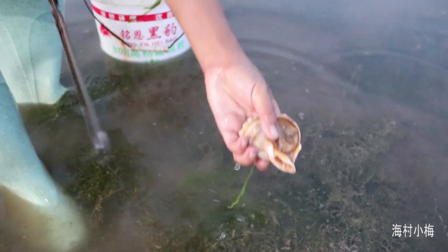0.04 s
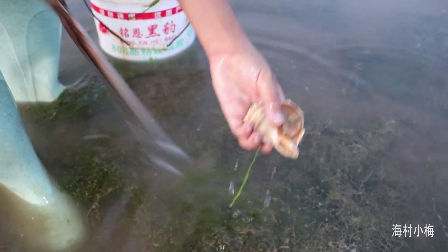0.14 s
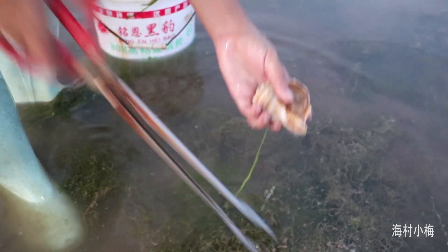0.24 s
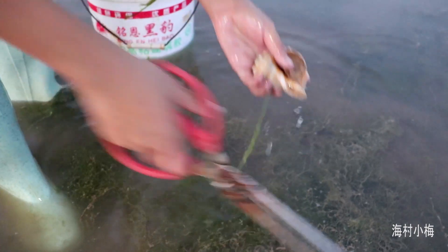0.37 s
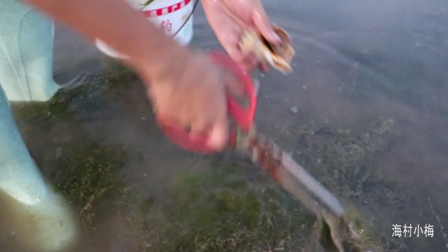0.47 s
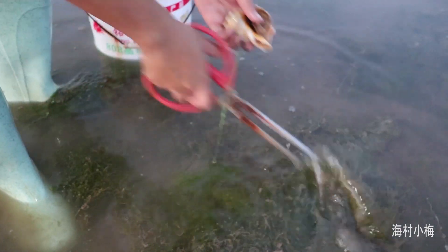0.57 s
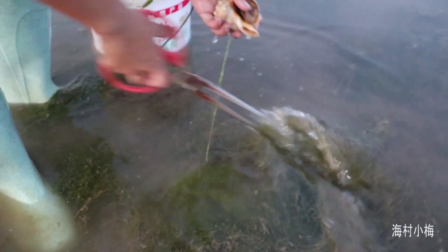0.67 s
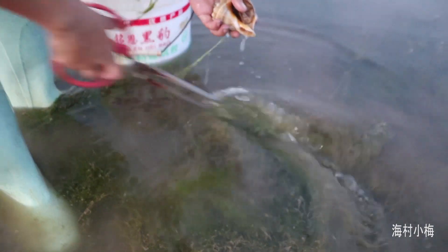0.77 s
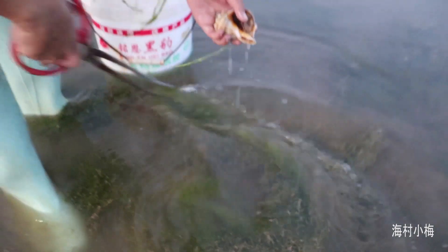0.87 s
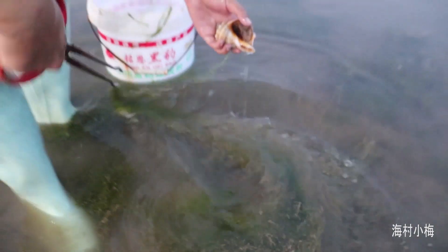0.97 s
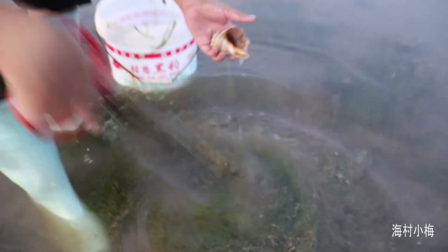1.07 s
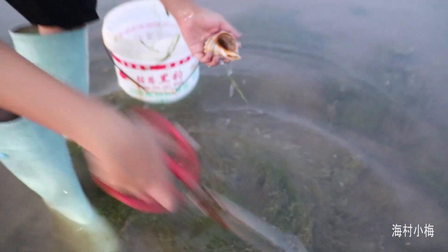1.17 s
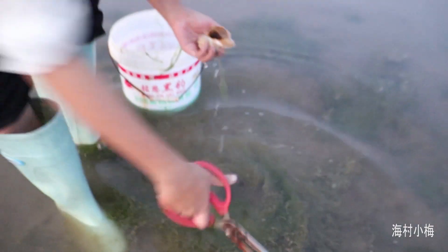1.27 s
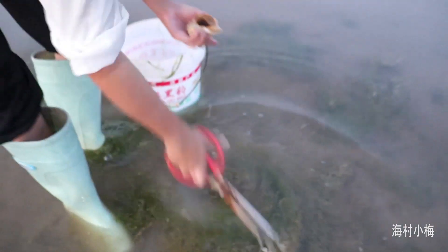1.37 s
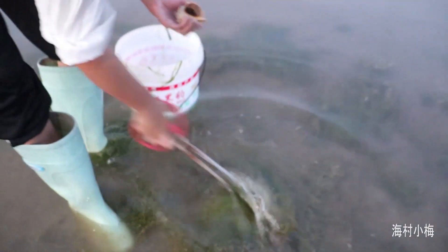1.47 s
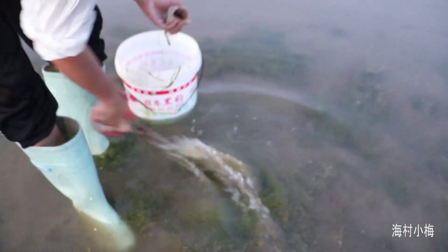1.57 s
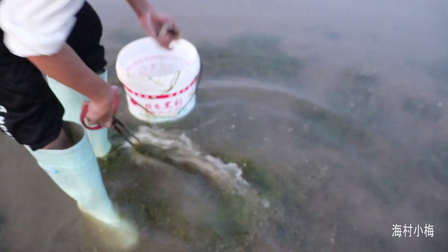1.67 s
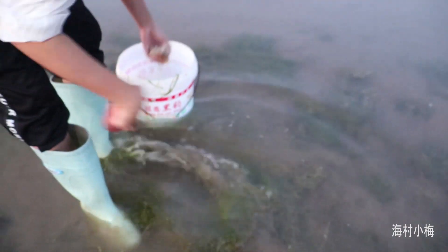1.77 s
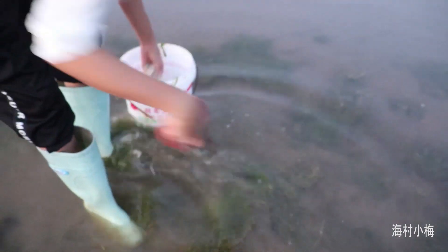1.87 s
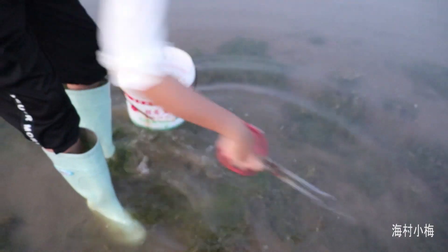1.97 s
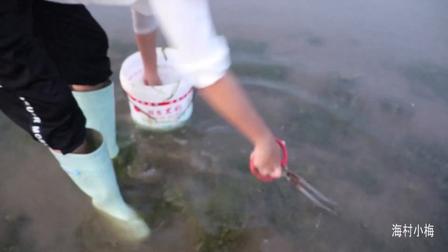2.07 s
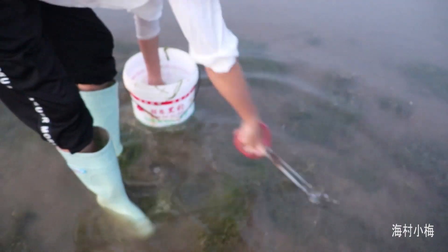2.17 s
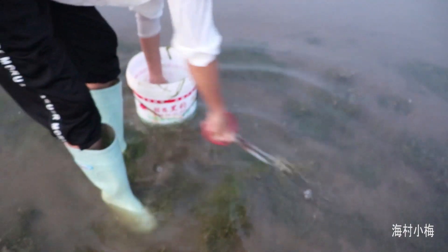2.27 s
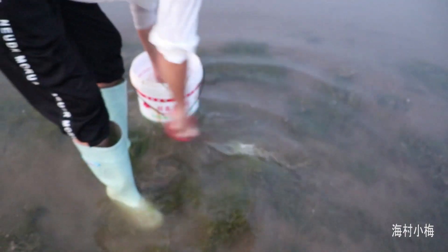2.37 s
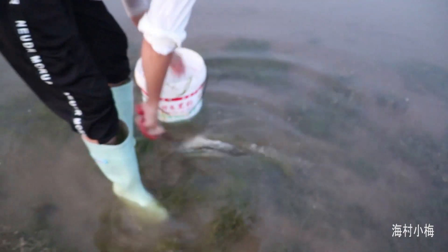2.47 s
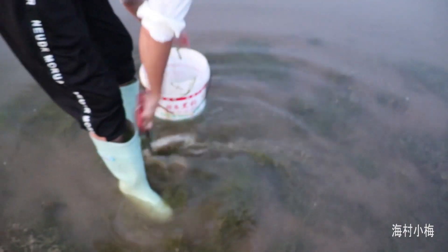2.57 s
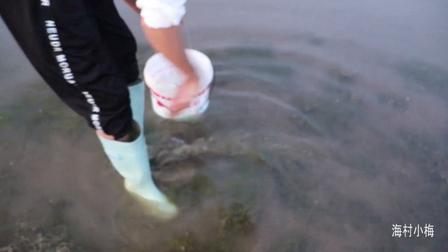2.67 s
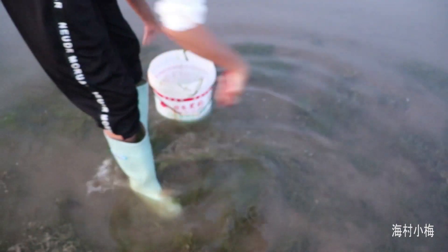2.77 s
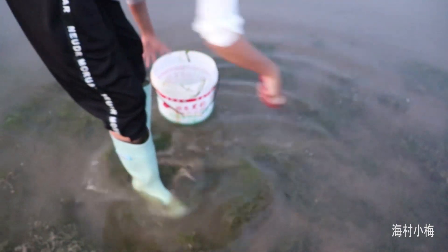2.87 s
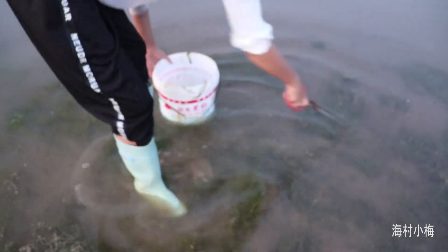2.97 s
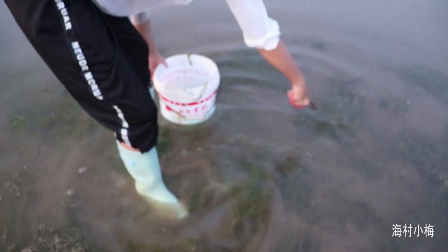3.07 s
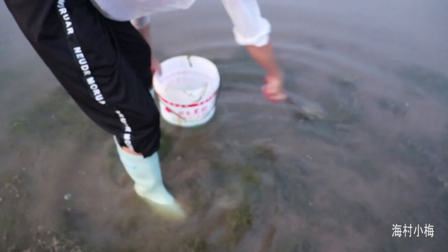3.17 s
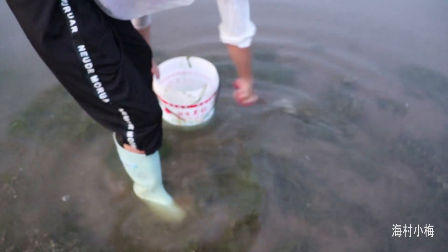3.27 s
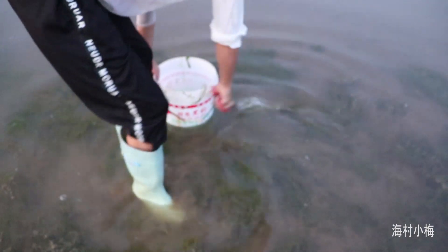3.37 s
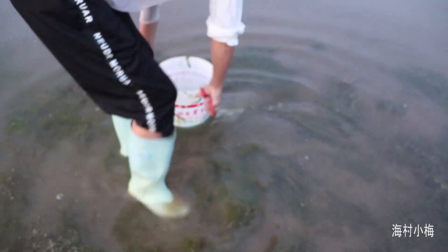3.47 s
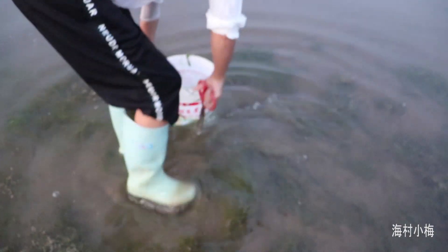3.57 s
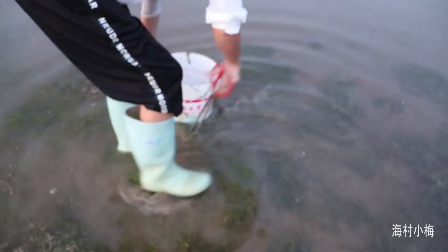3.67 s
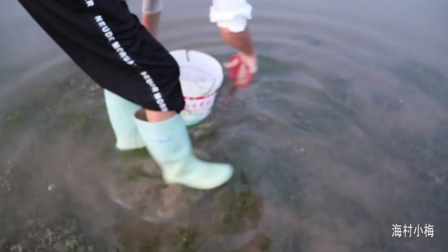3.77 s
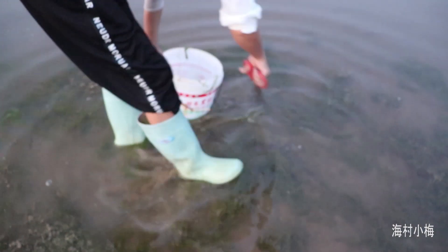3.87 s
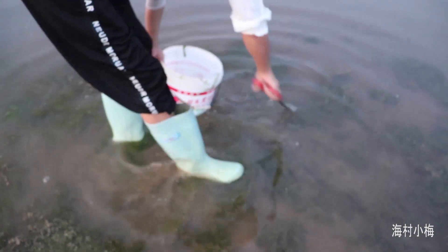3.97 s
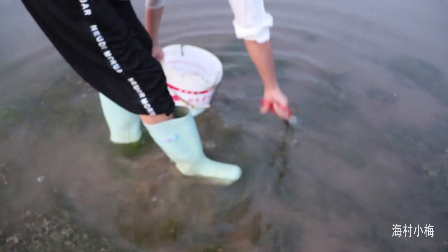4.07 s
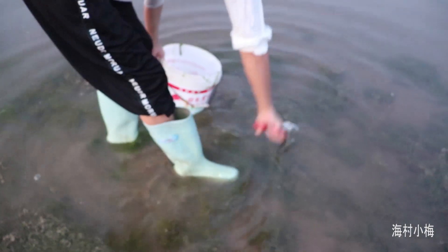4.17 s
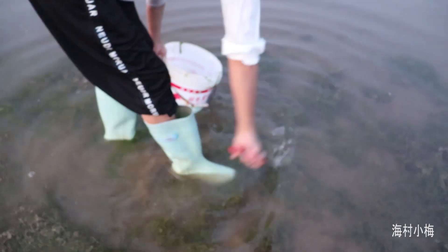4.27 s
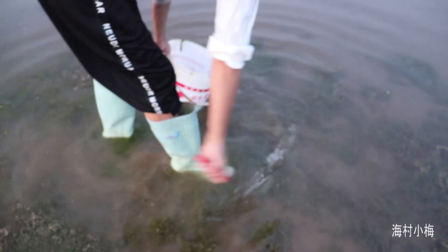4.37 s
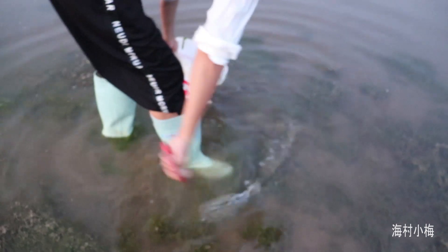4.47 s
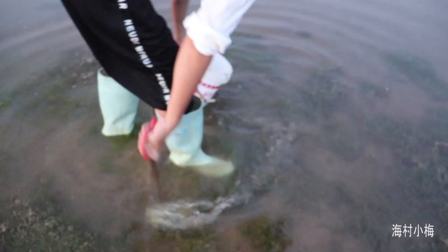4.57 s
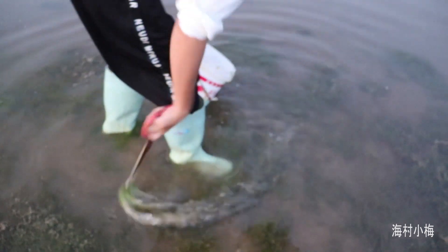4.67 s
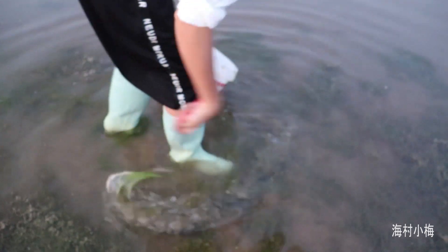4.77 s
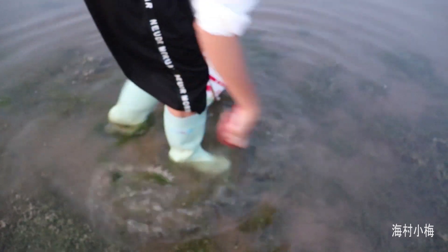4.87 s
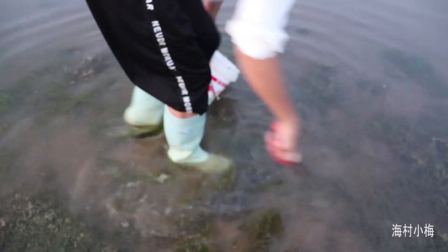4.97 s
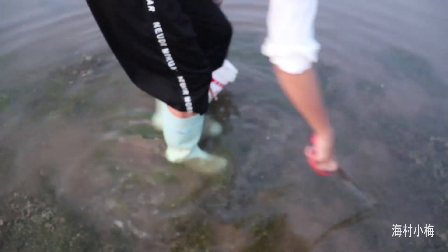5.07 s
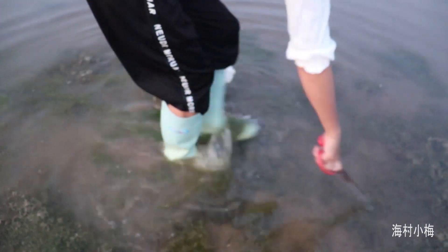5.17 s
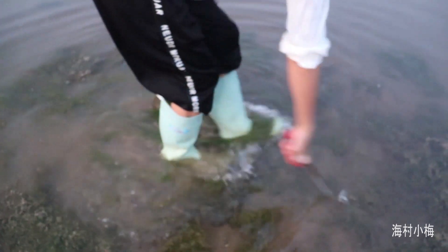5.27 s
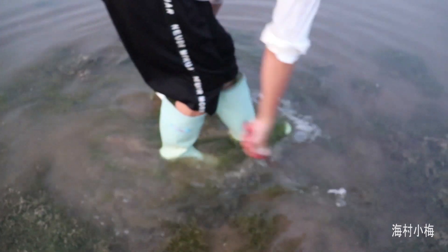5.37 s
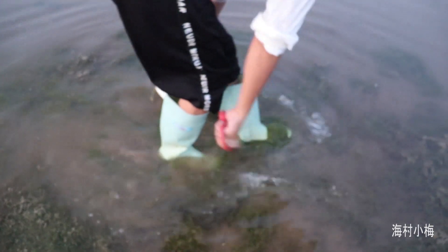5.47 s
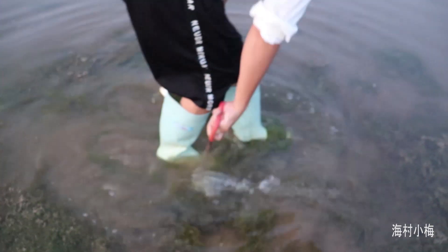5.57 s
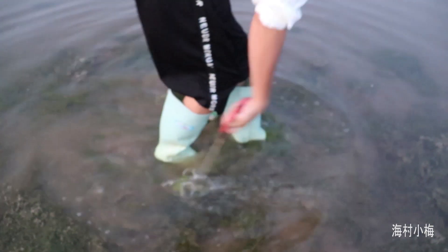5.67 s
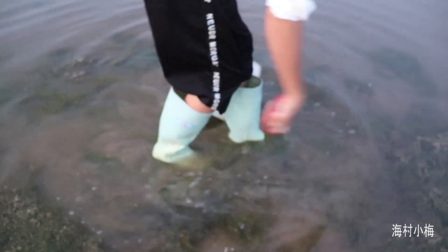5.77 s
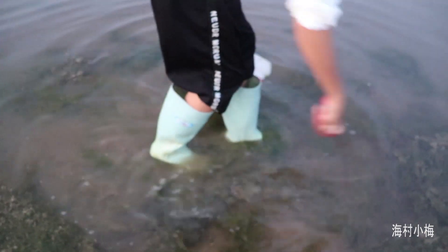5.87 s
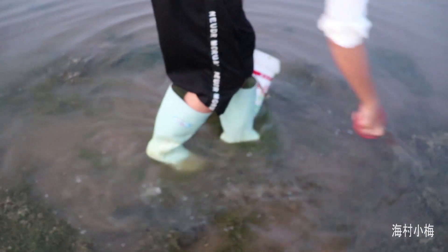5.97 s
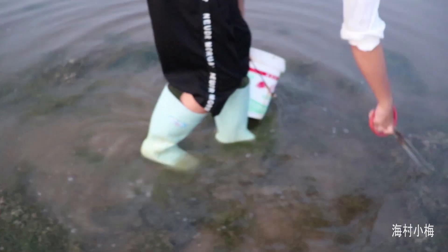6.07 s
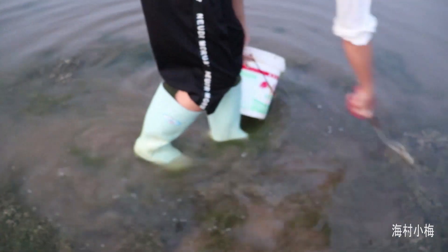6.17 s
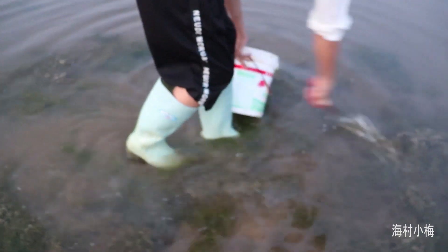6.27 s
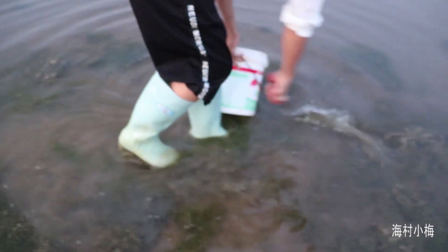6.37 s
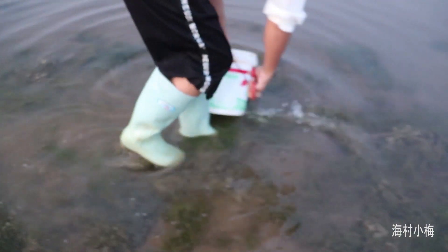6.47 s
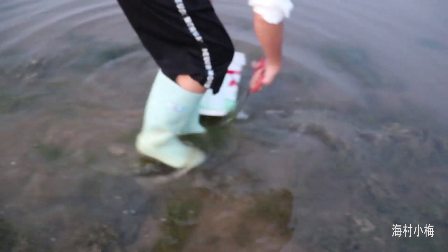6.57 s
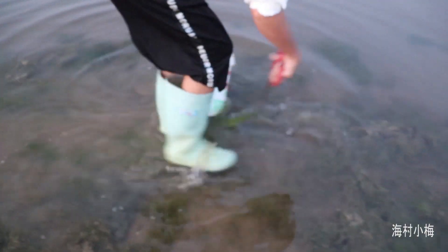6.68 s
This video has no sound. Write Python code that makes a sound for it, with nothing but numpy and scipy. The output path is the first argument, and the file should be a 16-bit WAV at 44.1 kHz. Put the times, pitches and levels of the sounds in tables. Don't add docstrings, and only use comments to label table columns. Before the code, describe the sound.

Long steel tongs rake through shallow seawater in bursts of splashing spray, with bubbling, pattering drops, boot slosh and a shell knocking a plastic bucket.

```python
import sys
import numpy as np
from scipy import signal
from scipy.io import wavfile
from scipy.ndimage import uniform_filter1d, map_coordinates

SR = 44100
rng = np.random.default_rng(int(sys.argv[2]) if len(sys.argv) > 2 else 0)


def dump_mix(stems):
    frames = np.atleast_2d(stems).T
    limited = np.clip(frames, -1, 1)
    pcm = np.round(limited * 32767).astype(np.int16)
    wavfile.write(sys.argv[1], SR, pcm)


def to_linear_factor(level_db):
    exponent = np.asarray(level_db, float) / 20
    return 10 ** exponent


N = 297234

# [t/s, rise/s, fall/s, spray level at the crest/dB, mist over spray/dB,
# extra slosh/dB]
STROKES = [
    (1.437, 0.086, 0.05, -27.5, 3, 0),
    (1.575, 0.052, 0.12, -32, 0.5, 6.5),
    (2.201, 0.097, 0.33, -30, 0, 1.5),
    (3.237, 0.15, 0.24, -33, 2.5, 2.5),
    (4.188, 0.0068, 0.12, -38.5, -2, 0),
    (4.331, 0.084, 0.243, -29.5, -1, -2.5),
    (5.341, 0.19, 0.075, -23.5, -1, -0.5),
    (6.336, 0.072, 0.15, -33, 1.5, 4),
]
# [t/s, length/s, slosh level/dB, spray level/dB]
PATTER = [(0.077, 0.067, -69, -51.5), (0.485, 0.025, -41.5, -39.5), (0.556, 0.047, -36.5, -39.5),
          (0.79, 0.18, -46.5, -49.5), (0.973, 0.061, -45.5, -62), (1.098, 0.061, -41, -49),
          (1.38, 0.041, -24.5, -26.5), (1.757, 0.12, -32.5, -38), (1.897, 0.34, -49, -49),
          (2.65, 0.36, -41.5, -42.5), (3.02, 0.28, -52, -55), (3.172, .055, -64, -51),
          (3.644, 0.4, -41, -46), (3.969, 0.17, -47, -49), (4.279, 0.1, -32, -64), (4.612, 0.22, -33, -46),
          (4.85, 0.11, -42.5, -45), (4.98, 0.53, -53.5, -53), (5.293, 0.05, -29.5, -37.5),
          (5.58, 0.15, -33.5, -43.5), (5.733, 0.17, -43.5, -45.5), (5.902, 0.29, -72, -54),
          (6.164, .11, -37, -43), (6.589, .2, -40.5, -47.5)]
# [t/s, half width/s, level/dB]
SURGES = [(1.433, 0.039, -8.5), (1.504, 0.044, 5.5), (1.557, 0.027, -3), (1.59, 0.0065, -10),
          (1.62, 0.024, 5), (2.27, 0.032, -7), (2.295, 0.018, 3), (2.39, 0.025, 6), (2.606, 0.0079, -2.5),
          (2.645, .01, 4.5), (3.26, 0.04, 5.5), (3.33, 0.042, -1.5), (3.451, 0.01, -5), (3.485, 0.0081, 1),
          (3.53, 0.013, -10.5), (3.583, 0.012, -8), (3.666, 0.0055, 11), (4.284, 0.0097, -8),
          (4.304, 0.014, 3.5), (4.325, .01, -7), (4.35, 0.011, 6.5), (4.42, .014, 3), (4.47, 0.021, -3),
          (4.493, 0.0069, 7), (4.522, 0.017, 7), (4.581, 0.011, 7), (4.61, 0.006, 9.5), (4.65, 0.016, -5),
          (5.3, 0.019, -6), (5.468, 0.026, 4), (5.55, 0.016, 6.5), (5.6, 0.0089, -2), (5.616, 0.0083, 5.5),
          (6.175, .02, -11), (6.383, 0.024, 5.5), (6.567, 0.034, -8)]
# [t/s, left over right level/dB]
SWEEP_PAN = [(0.0, 6), (0.34, 1), (4.79, -0.5), (6.74, -1.5)]
# [f/Hz, level per Hz/dB]
SLOSH = [(350, -23), (600, 7.5), (950, -16), (1500, 2), (2700, 3.5), (4000, 1.5)]
# [f/Hz, level per Hz/dB]
SPRAY = [(2500, -1), (5000, -5.5), (8040, 0.5), (9300, -2.5), (11700, -6), (14700, -9)]
# [f/Hz, width/Hz, level/dB]
TONGS = [(1360, 90, -2), (2660, 60, 7), (4220, 70, 6), (4800, 60, 4), (5500, 70, 0), (8000, 110, 5),
         (11950, 130, 4), (13900, 130, 5)]
# [t/s, f/Hz]
WAKE = [(1.4, 1114), (1.52, 1494), (1.62, 883), (1.88, 963), (2.25, 1000), (2.6, 1173), (3.25, 1200),
        (3.32, 1577), (3.45, 1098), (4.3, 1250), (4.55, 1000), (4.8, 836), (5.33, 1050), (5.39, 620),
        (5.445, 1506), (5.5, 1793), (5.55, 1000), (5.7, 1105), (6.37, 1170), (6.5, 1530)]
# [t/s, peak level/dB, f/Hz]
PLOPS = [(1.382, -24, 1280), (1.483, -21, 2550), (1.504, -14.5, 2530), (1.57, -16.5, 1940),
         (1.607, -17.5, 797), (1.63, -15, 930), (1.8, -18.5, 2450), (2.327, -6, 1485), (2.373, -18, 1490),
         (2.423, -23.5, 677), (2.484, -17.5, 1520), (2.618, -24.5, 2470), (3.431, -21, 2380),
         (3.539, -24.5, 2600), (3.611, -24.5, 1100), (3.619, -18.5, 1950), (4.333, -16.5, 2190),
         (4.386, -23.5, 1204), (4.581, -18, 3140), (4.607, -20, 1610), (1.001, -23, 2700),
         (5.464, -30, 1750), (5.535, -21, 1232), (5.558, -17.5, 2270), (6.369, -25, 2300),
         (6.411, -23, 1360), (6.46, -15, 2780), (6.475, -19.5, 2460)]
# [t/s, peak level/dB, f/Hz]
GURGLES = [(1.392, -7, 1335), (1.423, -16.5, 1100), (1.501, -13, 2650), (1.582, -19.5, 1210),
           (1.662, -14, 2220), (1.695, -15.5, 840), (1.78, -20, 1360), (1.819, -15.5, 1200),
           (1.872, -20.5, 1200), (2.247, -18, 1950), (2.403, -22.5, 630), (2.45, -20, 2630),
           (2.521, -20, 1260), (2.567, -20, 1020), (2.589, -24, 1570), (2.645, -17.5, 1750),
           (3.263, -17, 1390), (3.639, -17.5, 3100), (3.664, -20, 1340), (3.701, -19.5, 1270),
           (4.196, -25, 960), (4.298, -17, 1340), (4.416, -17, 1670), (4.489, -10.5, 3000),
           (4.537, -18, 1000), (4.633, -14.5, 1086), (4.75, -14.5, 1520), (4.774, -19, 910),
           (5.38, -12.5, 2970), (5.503, -14, 1510), (5.62, -20, 930)]
# [t/s, peak level/dB, f/Hz]
TRICKLE = [(2.684, -35, 1601), (2.733, -28, 3110), (2.755, -21.5, 1430), (2.809, -18.5, 1310),
           (2.823, -26, 1380), (2.847, -35, 756), (2.908, -34, 1560), (2.949, -30, 795), (2.983, -31, 703),
           (3.011, -34, 1640), (3.219, -27, 4170), (3.829, -33, 760), (3.926, -24.5, 1390),
           (3.976, -23, 2760), (4.029, -17, 2660), (4.112, -23, 3350), (5.041, -27.5, 1120),
           (5.13, -28.5, 2660), (5.259, -26, 1000), (5.849, -34, 855), (6.654, -27, 2080),
           (6.673, -22, 1760)]
# [t/s, peak level/dB, f/Hz, left over right level/dB]
DROPS = [(0.488, -25.5, 1315, -6), (0.554, -22.5, 2710, -14), (0.58, -20, 944, 4), (0.75, -32.5, 1750, -6),
         (0.81, -25.5, 1950, -4), (0.835, -27, 1540, -4), (0.883, -20.5, 1360, 2), (0.98, -27.5, 1420, 3),
         (1.981, -34, 1180, 4), (2.187, -21, 2730, -8), (2.231, -19, 975, 4), (2.792, -19, 2800, -4),
         (2.881, -22.5, 2560, 5), (3.692, -23, 1300, 0), (3.719, -19, 1330, 1), (3.789, -24, 1330, 0),
         (3.887, -26.5, 1430, 3.5), (4.011, -25.5, 1080, 2), (4.068, -23.5, 1320, 1),
         (4.148, -28, 2430, -3.5), (4.207, -24, 1000, 2), (4.827, -18, 2966, -3), (5.184, -24.5, 975, -1),
         (5.224, -20.5, 2690, -2.5), (5.244, -25.5, 965, 1), (5.882, -24.5, 1980, 0), (5.913, -28, 1622, 2),
         (6.316, -28.5, 1210, -9), (6.606, -27, 1540, 2), (6.711, -23, 2150, 0)]
# [t/s, peak level/dB, f/Hz, left over right level/dB]
TICKS = [(0.5367, -28, 3260, -2.0), (0.5869, -14.5, 4000, -2), (0.6787, -22.5, 7500, -3),
         (0.7253, -30, 3800, -4.5), (1.1363, -24.5, 4040, 4), (1.3831, -17.5, 4470, -3),
         (1.3962, -8.5, 6500, -2.5), (1.7419, -16.5, 3640, 3.5), (1.7998, -17.5, 3480, 4.5),
         (1.8947, -15.5, 3540, 5.5), (2.0528, -20, 3640, -2), (2.2135, -11, 5570, -5),
         (2.23, -10.5, 3700, -5), (3.24, -19.5, 4100, -3.5), (3.6927, -16.5, 3700, 13.5),
         (3.784, -18.5, 3800, 1), (3.8545, -15.5, 7160, 10.5), (3.8625, -23, 7100, 6),
         (3.8854, -21, 3320, 2), (3.997, -20.5, 5100, 3), (4.805, -18, 5040, 4), (4.8912, -13.5, 5100, 9),
         (5.187, -18.5, 3450, 5), (5.3887, -18, 3140, -1.0), (5.5762, -10, 7200, 1),
         (5.7618, -23, 2750, -1.0), (5.8064, -22.5, 3630, 9), (6.5987, -21, 6500, -2.5),
         (6.6382, -23.5, 3180, 0), (6.6716, -20, 5830, -4), (6.73, -24.5, 3550, 0)]
# [t/s, peak level/dB, f/Hz]
SPATTER = [(0.7908, -28, 4600), (0.805, -28, 5140), (1.059, -33.5, 5000), (1.165, -26.5, 4520),
           (1.2037, -32, 11600), (1.7622, -19, 3500), (1.846, -20, 8300), (1.8644, -27, 4740),
           (2.2951, -11.5, 4040), (2.6244, -18, 8300), (2.6467, -17.5, 5200), (2.6643, -22.5, 3650),
           (2.7272, -36, 7240), (3.676, -34, 3870), (3.7161, -29, 3507), (4.4064, -14.5, 4050),
           (4.5162, -11.5, 7900), (4.5356, -11, 4840), (4.6253, -15, 5800), (4.6688, -23, 8520),
           (4.687, -17, 3750), (4.716, -27, 3540), (4.751, -25, 3500), (4.767, -28, 7720),
           (4.786, -24, 5250), (4.8775, -20, 4860), (4.92, -30, 5500), (4.9347, -24.5, 3450),
           (4.9607, -25, 6840), (5.2844, -27.5, 3460), (5.322, -26, 3760), (5.359, -22, 3480),
           (5.502, -8, 3940), (5.6536, -24, 4140), (5.7219, -25, 3340), (5.7885, -26, 3660)]
# [t/s, peak level/dB, first f/Hz, last f/Hz, length/s]
GULPS = [(0.489, -27.5, 1100, 2950, 0.018), (3.446, -34.5, 450, 545, 0.041), (0.579, -27, 910, 960, 0.021),
         (1.101, -27.5, 707, 750, 0.035), (1.129, -32, 720, 2400, 0.019), (1.412, -27, 410, 730, 0.0595),
         (3.616, -29, 542, 660, 0.045), (3.786, -27, 438, 870, 0.087), (5.297, -27.5, 660, 1500, 0.054),
         (4.1, -33, 2000, 3550, 0.028), (5.206, -30.5, 1700, 4200, 0.021), (1.826, -26.5, 720, 1200, 0.032),
         (4.157, -36.5, 750, 880, 0.022), (1.005, -32.5, 855, 980, .025), (6.5, -38, 550, 710, 0.029),
         (3.71, -27.5, 1000, 1200, 0.0275)]
# [t/s, peak level/dB, f/Hz]
SLAPS = [
    (0.488, -26, 1820),
    (1.606, -7, 1310),
    (3.432, -11, 2600),
    (4.334, -10.5, 2260),
    (5.381, -15, 2900),
    (5.505, -14, 4020),
    (5.558, -15, 2304),
    (6.5, -12, 5500),
]
# [t/s, peak level/dB, f/Hz]
PUSHES = [(1.513, -25, 131), (1.637, -22, 160), (2.439, -17, 177), (2.713, -20, 184), (2.865, -19, 173),
          (3.008, -22.5, 245), (3.215, -26, 248), (3.735, -25, 220), (3.806, -16.5, 222), (4.231, -25, 183),
          (4.383, -12.5, 294), (4.586, -27, 238), (4.758, -24, 239.7), (5.311, -32, 205), (5.45, -29, 162)]
# [t/s, length/s, level/dB]
WASHES = [
    (1.593, 0.15, -30.5),
    (3.424, 0.11, -41.5),
    (4.715, 0.2, -40),
    (4.939, 0.16, -43.5),
    (6.178, 0.16, -34.5),
]
# [t/s, peak level/dB]
SHELL = [
    (2.325, -2),
    (2.33, -4),
    (2.424, -4.5),
    (2.926, -13),
    (5.225, -8.5),
]
# [f/Hz, level/dB, time to fall 60 dB/s]
BUCKET = [(561, 2, 0.026), (1600, -2.5, 0.0082), (2450, -6, 0.029), (3640, -25, .01)]
# [t/s, buffet level/dB]
GUST = [(0.0, -51.5), (1.24, -44.5), (1.43, -44), (1.5, -36.5), (1.95, -43.5), (2.21, -41), (2.27, -55),
        (2.48, -29.5), (2.61, -46), (3.12, -61.5), (3.4, -58), (3.81, -49), (4.09, -85), (4.28, -49),
        (4.99, -109), (5.22, -44), (5.61, -76), (6.74, -58)]
# [f/Hz, level per Hz/dB]
SHORE = [(400, -16), (700, 4.5), (1300, -12), (2600, -16.5), (4500, -14), (9000, -17), (16400, -25)]
# [f/Hz, width/Hz, level/dB]
SHORE_BANDS = [(1000, 21, 8), (1715, 265, 8.5), (5800, 310, -1.5)]
# [t/s, f/Hz, level/dB]
WADER = [
    (2.03, 2750, -66),
    (2.07, 2300, -56),
    (2.11, 2200, -54),
    (2.15, 2600, -55),
    (2.185, 3100, -58),
]
# [f/Hz, likeness from -1 to 1]
LIKENESS = [(30, .6), (125, 0.7), (300, 0.66), (700, 0.75), (2000, 0.58), (5000, 0.69), (12000, 0.63)]

ATTACK_S, SLOSH_RELEASE_DB_PER_S, SPRAY_RELEASE_DB_PER_S = 0.0013, 337, 603
CALM_SLOSH_DB, CALM_SPRAY_DB = -56.5, -61
MIST_STEEPER, PATTER_MIST_DB = 0.067, -4
SWELL_DB_PER_S, SAG_DB = 53, 3
SLOSH_SWELLS, STROKE_SLOSH_DB = 0.52, -5.5
PATTER_SAG_DB_PER_S = 2.5
EDGEWISE_S = 5.47
WAKE_DB, WAKE_WIDTH_HZ = -11.5, 90
PORT_LAG, PORT_WANDER_PER_S = 1.1, 2.5
RUMBLE_DB, RUMBLE_FOLLOWS, RUMBLE_STIRRED_DB = -46.5, 0.19, -42
SHORE_DB = -44.5
INSECT_DB, INSECT_HZ, INSECT_FALL_HZ, INSECT_GAP_S = -62, 6400, 800, 0.064


def stir(s, length, shape_db, release):
    out, i = np.zeros(N), int(s * SR)
    t = np.arange(min(N - i, int((length + 60 / release) * SR))) / SR
    level_db = shape_db(np.minimum(t, length)) - release * np.maximum(t - length, 0)
    attack = np.minimum(t / ATTACK_S, 1)
    out[i:i + len(t)] = to_linear_factor(2 * level_db) * attack ** 2
    return out


def stirring():
    slosh, spray = to_linear_factor(2 * CALM_SLOSH_DB), to_linear_factor(2 * CALM_SPRAY_DB)
    mist = to_linear_factor(2 * (CALM_SPRAY_DB + PATTER_MIST_DB))
    for s, rise, fall, spray_db, fine_db, deep_db in STROKES:
        length = rise + fall

        def crest(t):
            return np.interp(t, [0, rise, length], [-SWELL_DB_PER_S * rise, 0, -SAG_DB])

        def slosh_shape(t):
            return spray_db + STROKE_SLOSH_DB + deep_db + SLOSH_SWELLS * crest(t)

        def mist_shape(t):
            return spray_db + fine_db + (1 + MIST_STEEPER) * crest(t)

        slosh = slosh + stir(s, length, slosh_shape, SLOSH_RELEASE_DB_PER_S)
        spray = spray + stir(s, length, lambda t: spray_db + crest(t), SPRAY_RELEASE_DB_PER_S)
        mist = mist + stir(s, length, mist_shape, SPRAY_RELEASE_DB_PER_S)

    def sag(t):
        return -PATTER_SAG_DB_PER_S * t

    for s, length, slosh_db, spray_db in PATTER:
        slosh = slosh + to_linear_factor(2 * slosh_db) * stir(s, length, sag, SLOSH_RELEASE_DB_PER_S)
        fine = to_linear_factor(2 * spray_db) * stir(s, length, sag, SPRAY_RELEASE_DB_PER_S)
        spray = spray + fine
        mist = mist + to_linear_factor(2 * PATTER_MIST_DB) * fine
    return 10 * np.log10([slosh, spray, mist])


def surges():
    out = np.zeros(N)
    for s, half, level_db in SURGES:
        i = np.arange(int((s - half * 2) * SR), int((s + half * 2) * SR))
        out[i] += level_db * np.exp(-2 * ((i / SR - s) / half) ** 2)
    return out


def bubble_crowd():
    crowd, draw = np.zeros((2, N)), rng.random((1900, 6))
    pockets_hz = np.interp(draw[:, 0] * N / SR, *np.transpose(WAKE))
    for pocket_hz, (when, size, loud, rise, place, ring) in zip(pockets_hz, draw):
        hz = pocket_hz * (.88 + size) if size < .25 else 380 * 18 ** size
        level_db = -3.2 * np.log(loud + .2) + .5 * at_hz(SLOSH, min(hz, 3100))
        level_db -= 5.0 * max(np.log2(hz / 3000), 0)
        sound = bubble(hz, 3.0 + 7.0 * ring ** 3, .32 * rise - .05)
        add(crowd, when * N / SR, to_linear_factor(level_db) * sound, 18.0 * (place - .5))
    return rms_one(crowd)


def sweeps(slosh_db, spray_db, mist_db):
    sparse = np.clip((-33 - spray_db) / 10, .25, 1)
    surge_db = 1.5 * drift(45)
    clumps = np.minimum(rng.exponential(1, (2, 1, N)), 6)
    white = rng.standard_normal((2, 2, N)) * to_linear_factor(3.0 * sparse * clumps)
    white = white / np.sqrt(uniform_filter1d(white ** 2, size=8000))
    rush = banded(white, SLOSH, 314, 3550, patchy_db=6.0, flicker=7.0)
    slosh = to_linear_factor(slosh_db + surge_db) * (to_linear_factor(-8.5) * rush + to_linear_factor(-5.0) * bubble_crowd())

    spatter_db = .5 * surge_db + sparse * (2.5 * drift(70) + 3.5 * drift(260))
    spray = banded(white[::-1, :, ::-1], SPRAY, 2500, 8000, patchy_db=2.8, flicker=50)
    mist = banded(white[:, :, ::-1], SPRAY, 8230, 16540, patchy_db=3.5, flicker=28)
    fine = to_linear_factor(spatter_db) * (to_linear_factor(spray_db - 3) * spray + to_linear_factor(mist_db - 3) * mist)
    water = to_linear_factor(2.0) * high_pass(slosh, 570) + fine

    immersed = np.clip((mist_db + 48) / 12, 0, 1)
    immersed = immersed * np.clip(np.abs(np.arange(N) / SR - EDGEWISE_S) * 2, .3, 1)
    ringing = resonate(water, TONGS) - water
    return sides(in_time(SWEEP_PAN)[0]) * (water + immersed * ringing)


def wake(slosh_db, spray_db):
    r = np.exp(-np.pi * WAKE_WIDTH_HZ / SR)
    flutter = signal.lfilter([1 - r], [1, -r], rng.standard_normal((2, N)))
    hz = in_time(WAKE)[0] * (1 + .05 * drift(15))
    turn = 2 * np.pi * np.cumsum(hz) / SR
    hum = rms_one(flutter[0] * np.cos(turn) + flutter[1] * np.sin(turn))
    cutting = np.clip((spray_db + 40) / 8, 0, 1)
    return cutting * to_linear_factor(slosh_db + WAKE_DB + 6.7 * drift(27)) * hum


def ports(x):
    at = np.arange(N) + PORT_LAG * drift(PORT_WANDER_PER_S)
    return np.array([x[0], map_coordinates(x[1], [at], order=3, mode="nearest")])


def bubble(hz, cycles, rise):
    t = np.arange(int(5 * cycles / hz * SR) + 8) / SR
    tau = cycles / hz
    return np.sin(2 * np.pi * hz * (t + rise * t * t / (4 * tau))) * np.exp(-t / tau)


def crack(decay_s, hz):
    noise = rng.standard_normal(900)
    band = signal.butter(1, [hz, min(2.5 * hz, 16000)], "band", fs=SR, output="sos")
    u = np.arange(len(noise)) / (decay_s * SR)
    slap = signal.sosfilt(band, noise * np.minimum(2 * u, 1) * np.exp(-u))
    return slap / np.abs(slap).max()


def drops():
    out = np.zeros((2, N))
    softer = [(s, peak_db - 7.5, hz) for s, peak_db, hz in GURGLES + TRICKLE]
    near_tongs = [(s, peak_db, hz, -1.5 + 3.0 * np.sin(70 * s)) for s, peak_db, hz in PLOPS + softer]
    for s, peak_db, hz, pan_db in DROPS + near_tongs:
        draw = rng.random(8)
        ring = bubble(hz, 3.5 + 3.0 * draw[0], .16 * draw[1] - .02)
        add(out, s, to_linear_factor(peak_db + 1.5) * ring, pan_db)
        add(out, s, to_linear_factor(peak_db - 8.5) * crack(0.003, 1.6 * hz), pan_db)
        for late, higher, place in draw[2:].reshape(2, 3):
            small = bubble(hz * (1.2 + 1.2 * higher), 4.0, .12)
            add(out, s + .012 * late, to_linear_factor(peak_db - 6) * small, pan_db + 8.0 * (place - .5))
    return out


def ticks():
    out = np.zeros((2, N))
    spatter = [(s, peak_db, hz, 4.0 * np.sin(50 * s)) for s, peak_db, hz in SPATTER]
    for s, peak_db, hz, pan_db in TICKS + spatter:
        ring = bubble(hz, 4.0 + 7.0 * rng.random(), 0.1 * rng.random())
        add(out, s, to_linear_factor(peak_db - 3) * ring, pan_db)
        add(out, s, to_linear_factor(peak_db - 1.0) * crack(0.002, hz), pan_db)
    return out


def gulps():
    out = np.zeros((2, N))
    for s, peak_db, first_hz, last_hz, length in GULPS:
        u = np.arange(int(length * SR)) / (length * SR)
        hz = first_hz + (last_hz - first_hz) * u ** 2.0
        shape = np.minimum(30 * u, 1) * np.exp(-1.2 * u) * np.minimum(6 * (1 - u), 1)
        wobble = 1 + .35 * np.sin(2 * np.pi * u * length * 70 + 9 * s)
        add(out, s, to_linear_factor(peak_db) * shape * wobble * np.sin(2 * np.pi * np.cumsum(hz) / SR), 0)
    return out


def slaps():
    out = np.zeros((2, N))
    for s, peak_db, hz in SLAPS:
        add(out, s, to_linear_factor(peak_db) * bubble(hz, 1.0, 0), 0)
    return out


def pushes():
    out = np.zeros((2, N))
    for s, peak_db, hz in PUSHES:
        push = bubble(hz, .95, -.1)
        soft_start = np.minimum(np.arange(len(push)) * hz / SR / .6, 1)
        add(out, s, to_linear_factor(peak_db + 3) * push * soft_start, 22.0 * (rng.random() - .5))
    return out


def boots():
    t, shape = np.arange(N) / SR, np.zeros(N)
    for s, length, level_db in WASHES:
        shape += to_linear_factor(level_db) * np.sin(np.pi * np.clip((t - s) / length, 0, 1)) ** 0.44
    color = [(250, -7.5), (600, 0.0), (1200, -6.5), (4000, -19.5)]
    return shape * banded(rng.standard_normal((2, 2, N)), color, 250, 4000, patchy_db=4.0, flicker=18)


def shell_knocks():
    out, t = np.zeros((2, N)), np.arange(3000) / SR
    hit = 0
    for hz, level_db, t60 in BUCKET:
        hit = hit + to_linear_factor(level_db - 7.4 * 9.3 * t / t60) * np.sin(2 * np.pi * hz * t)
    for s, peak_db in SHELL:
        add(out, s, to_linear_factor(peak_db - 11.0) * hit, -1.5)
    return out


def wind(slosh_db):
    buffet_db, = in_time(GUST)
    wind_rumble_db = RUMBLE_DB + RUMBLE_FOLLOWS * (buffet_db - buffet_db.mean())
    rumble_db = 10 * np.log10(to_linear_factor(2 * wind_rumble_db) + to_linear_factor(2 * (slosh_db + RUMBLE_STIRRED_DB)))
    white = rng.standard_normal((2, 2, N))
    lumps_db = 2.0 * drift(10)
    buffet_color = [(20, -18), (50, 16.0), (130, 10.5)]
    rumble_color = [(120, -3.5), (250, -3.0), (450, -12.0)]
    buffet = banded(white, buffet_color, 8.4, 135, patchy_db=-3.5, flicker=2.7)
    rumble = banded(white[::-1], rumble_color, 90.0, 456, patchy_db=3.0, flicker=21.5)
    buffet = buffet * sides(9.0 * drift(4))
    rumble = rumble * sides(6.0 * drift(8))
    return to_linear_factor(buffet_db + lumps_db - 2.0) * buffet + to_linear_factor(rumble_db + 0.4 * lumps_db) * rumble


def shore():
    hiss = banded(rng.standard_normal((2, 2, N)), SHORE, 400, 16400, patchy_db=.7, flicker=6)
    return to_linear_factor(SHORE_DB - 8.5) * resonate(hiss, SHORE_BANDS)


def insects():
    out, u = np.zeros((2, N)), np.linspace(0, 1, 1800)
    for k, (late, shift, loud) in enumerate(rng.random((105, 3))):
        hz = INSECT_HZ * (1 - 0.0495 * shift) - INSECT_FALL_HZ * u
        chirp = np.sin(np.pi * u) * np.sin(2 * np.pi * np.cumsum(hz) / SR)
        add(out, (k + .15 * late) * INSECT_GAP_S + .016, to_linear_factor(INSECT_DB + 6 * loud) * chirp, -2.5)
    return out


def bird():
    hz, level_db = in_time(WADER)
    t = np.arange(N) / SR
    singing = np.clip(np.minimum(t - WADER[0][0], WADER[-1][0] - t) / .01, 0, 1)
    return singing * to_linear_factor(level_db) * np.sin(2 * np.pi * np.cumsum(uniform_filter1d(hz, size=900)) / SR)


def rms_one(x):
    return x / np.sqrt(np.mean(x ** 2) + 1e-20)


def in_time(rows):
    s, *columns = np.transpose(rows)
    return [np.interp(np.arange(N) / SR, s, c) for c in columns]


def at_hz(points, hz):
    points_hz, values = np.transpose(points)
    return np.interp(np.log(hz), np.log(points_hz), values)


def drift(rate):
    r = np.exp(-40 * np.pi * rate / SR)
    noise = rng.standard_normal(N // 20 + 2002)
    slow = signal.lfilter([1], [1, -2 * r, r * r], noise)[2000:]
    return np.interp(np.arange(N) / 20, np.arange(len(slow)), rms_one(slow))


def sides(pan_db):
    return to_linear_factor(np.array([.5 * pan_db, -.5 * pan_db]))


def add(out, s, sound, pan_db):
    for channel, gain in enumerate(sides(pan_db)):
        i = max(int(s * SR + (channel - .5) * .45 * pan_db), 0)
        part = sound[:max(N - i, 0)]
        out[channel, i:i + len(part)] += gain * part


def banded(white, spectrum, low_hz, high_hz, patchy_db, flicker):
    out = 0
    edges = np.geomspace(low_hz, high_hz, int(2 * np.log2(high_hz / low_hz)) + 2)
    for k, (low, high) in enumerate(zip(edges, edges[1:])):
        band = signal.butter(2, [low, high], "band", fs=SR, output="sos")
        mid, side = signal.sosfilt(band, white[k % 2])
        hz = np.sqrt(low * high)
        alike = np.clip(at_hz(LIKENESS, hz), -1, 1)
        gain = to_linear_factor(at_hz(spectrum, hz) + patchy_db * drift(flicker))
        out = out + gain * (np.sqrt(1 + alike) * mid + np.sqrt(1 - alike) * side * [[1], [-1]])
    return rms_one(out)


def high_pass(x, hz):
    return signal.sosfilt(signal.butter(2, hz, "high", fs=SR, output="sos"), x)


def resonate(x, peaks):
    for hz, width, level_db in peaks:
        r = np.exp(-np.pi * width / SR)
        feedback = [1, -2 * r * np.cos(2 * np.pi * hz / SR), r * r]
        x = x + to_linear_factor(level_db) * signal.lfilter([(1 - r * r) / 2, 0, (r * r - 1) / 2], feedback, x)
    return x


def scene():
    levels_db = stirring() + surges()
    slosh_db, spray_db, mist_db = levels_db
    raked = ports(sweeps(slosh_db, spray_db, mist_db) + wake(slosh_db, spray_db))
    falling = high_pass(drops() + ticks() + gulps(), 185)
    shoved = slaps() + pushes() + boots() + shell_knocks()
    background = wind(slosh_db) + shore() + insects() + bird()
    return raked + falling + shoved + background


def band_limit(x):
    return signal.sosfilt(signal.butter(12, 16640, fs=SR, output="sos"), x)


def record(dry):
    top_cut = signal.cheby2(10, 60, 16750, fs=SR, output="sos")
    return band_limit(signal.sosfilt(top_cut, dry))


dry = scene()
out = record(dry)
dump_mix(out)
```